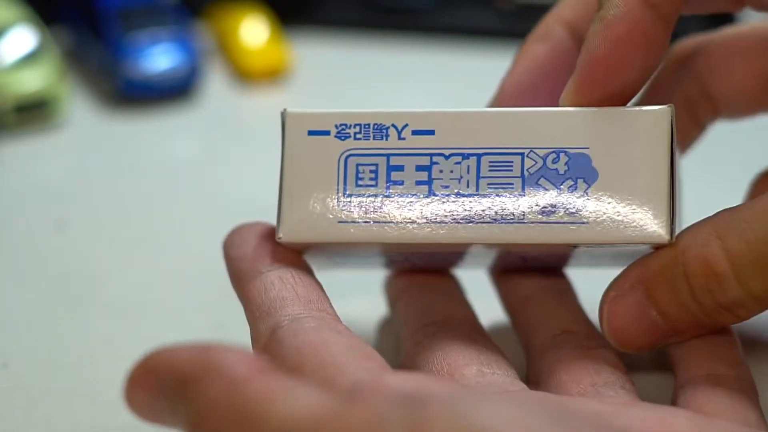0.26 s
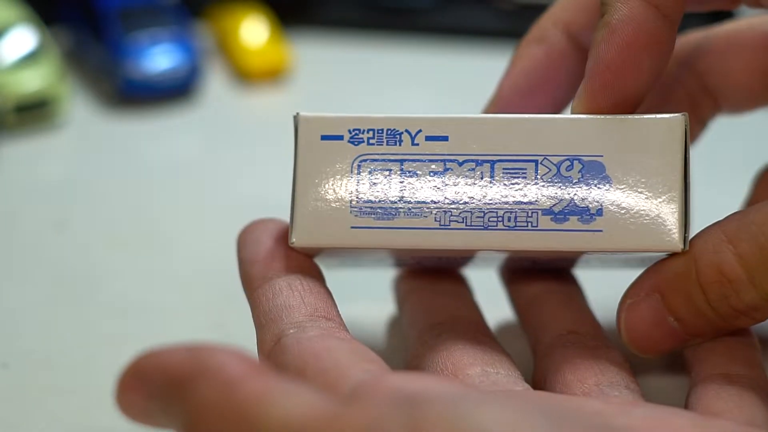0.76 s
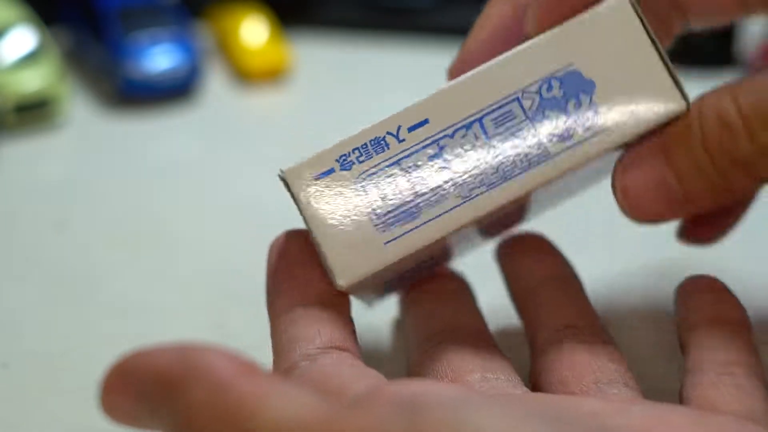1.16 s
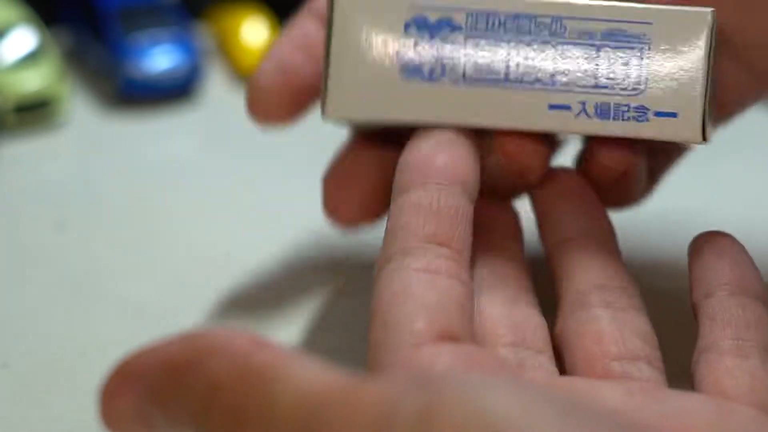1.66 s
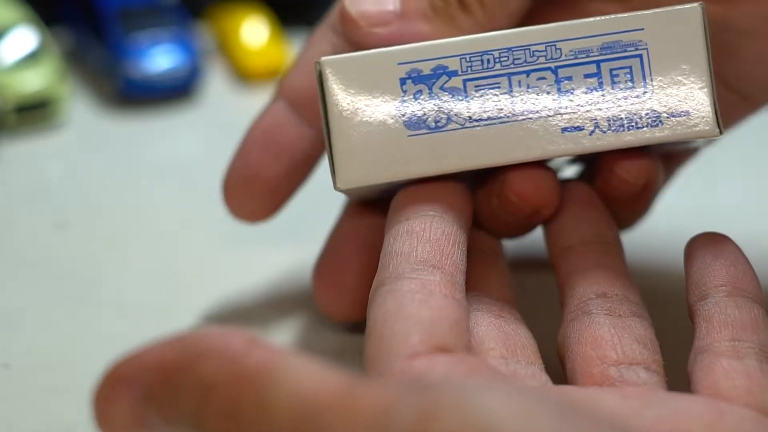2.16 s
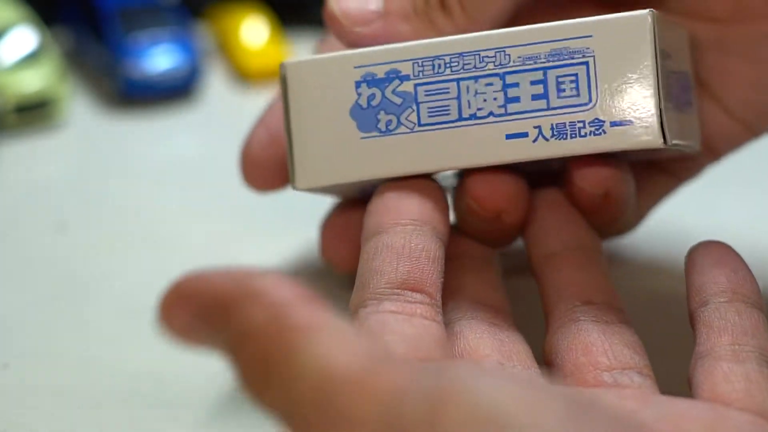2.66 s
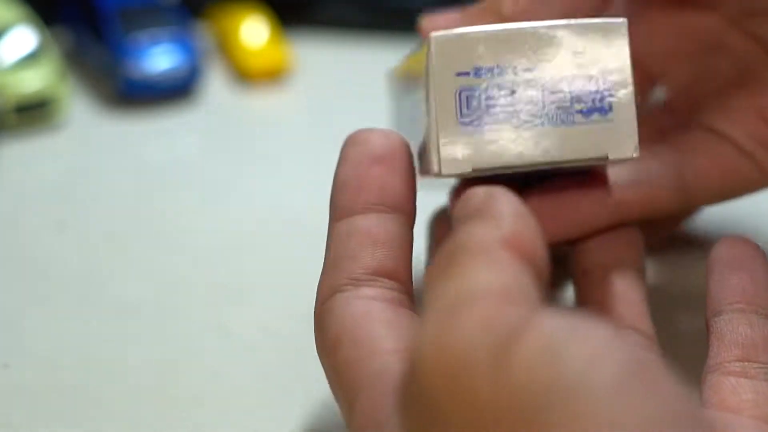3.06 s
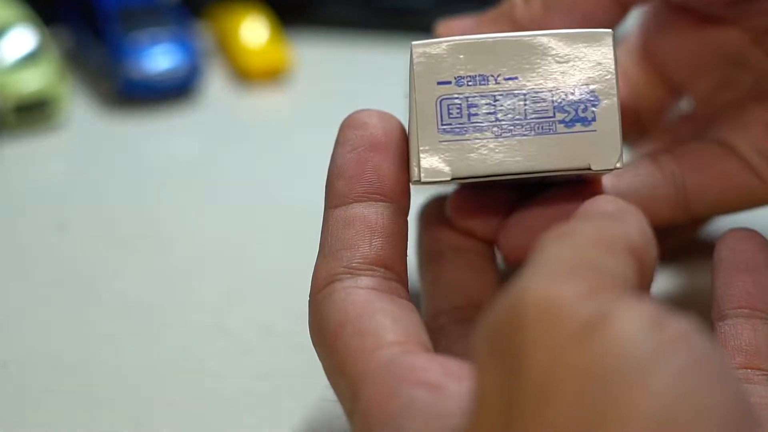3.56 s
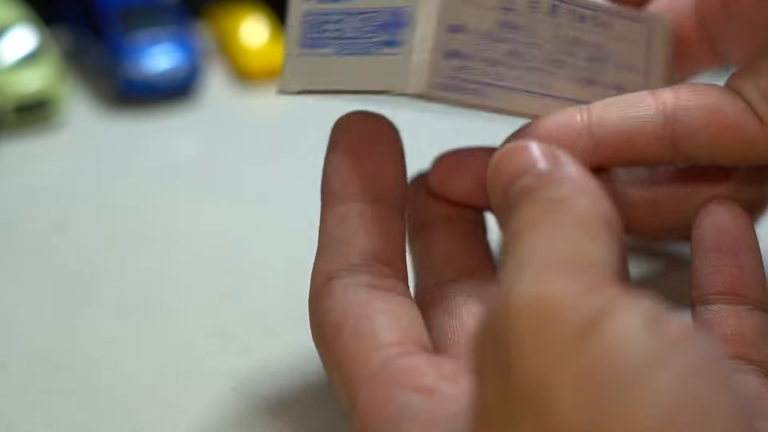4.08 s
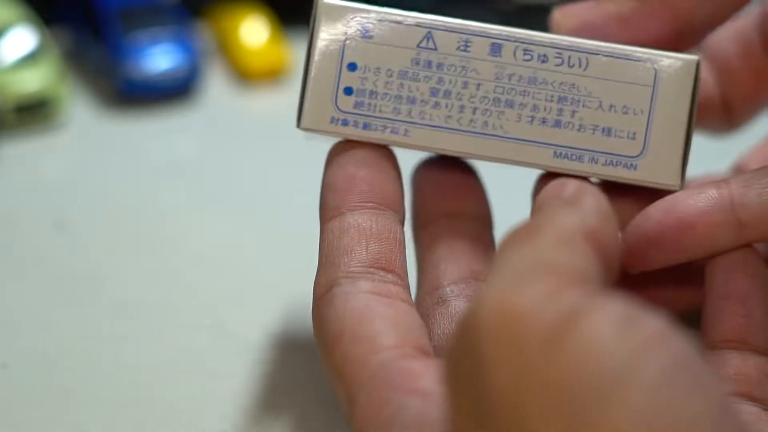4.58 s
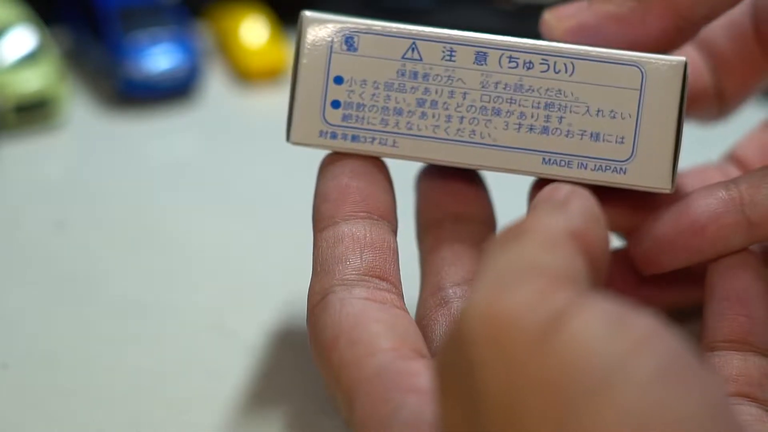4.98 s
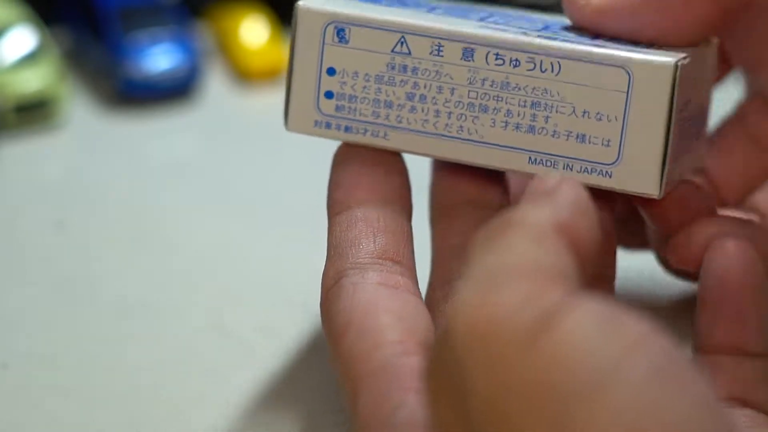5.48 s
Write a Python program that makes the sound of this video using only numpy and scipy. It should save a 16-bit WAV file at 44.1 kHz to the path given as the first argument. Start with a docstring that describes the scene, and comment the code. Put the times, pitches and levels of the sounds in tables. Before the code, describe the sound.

Close, dry clicks and skin rubs on a glossy little carton, one hard double knock midway, over steady fan rush, hum and approaching engine drone.

```python
"""A sharp knock on a small glossy cardboard box close to the microphones, then fingers turning it in the hand.
Nails and the toy inside tap its walls, which ring briefly; skin slides and rasps on the coat as grainy noise.
Behind it two machines hum a little apart in pitch and beat, a fan rushes as shaped noise, and faint tones glide.
Outside an engine slowly draws nearer: sines on multiples of its firing rate, with a narrow whine of noise."""
import sys
import numpy as np
from scipy import signal
from scipy.fft import rfft, irfft, next_fast_len
from scipy.io import wavfile
from scipy.ndimage import uniform_filter1d, map_coordinates

SR = 44100
rng = np.random.default_rng(int(sys.argv[2]) if len(sys.argv) > 2 else 0)


def wav_out(sig):
    """Save sig, one row per channel (or a flat mono array), as 16-bit PCM at SR to the path in sys.argv[1]."""
    wavfile.write(sys.argv[1], SR, np.round(np.clip(np.atleast_2d(sig).T, -1, 1) * 32767).astype(np.int16))


N = 252693

# Resonances of the box walls. Each row: pitch in Hz, relative level in dB when struck on the long face,
# relative level in dB when struck on the end face, time in s to fall 60 dB at a grip of 1.
WALLS = [(450, -28, -7, 0.02), (745, 1.5, -4, 0.012), (1134, -15, 3, 0.015), (1424, -4.5, -15.5, 0.014),
         (1834, 5, -5.5, 0.0058), (2220, -15.5, -18, 0.012), (2647, 3, -2, 0.0043), (3010, -9, -5, 0.0039),
         (3600, -2, -8, 0.0059), (4420, -8.5, -13.5, 0.011), (4740, -27, -19, 0.0039),
         (5370, -5, -9, 0.0043), (6230, -16, -30, 0.0062), (7000, -1, -25, 0.0086), (8450, -15, -6, 0.005)]


def amp(db):
    """Gain of a level in dB."""
    return 10 ** (np.asarray(db) / 20)


def unit(x):
    """Scaled to rms 1."""
    return x / np.sqrt(np.mean(x ** 2) + 1e-20)


def curves(rows):
    """One value per sample for each column after the time."""
    s, *columns = np.transpose(rows)
    return [np.interp(np.arange(N) / SR, s, column) for column in columns]


def wobble(rate):
    """A smooth random curve, rate knots a second."""
    knots = rng.standard_normal(int(N * rate / SR) + 4)
    return map_coordinates(knots, [np.arange(N) * rate / SR])


def filtered(x, response):
    """x times a response of frequency, with room for the filter to ring out."""
    m = next_fast_len(N + SR // 2)
    return irfft(rfft(x, m) * response(np.fft.rfftfreq(m, 1 / SR)), m)[..., :N]


def coloured(x, spectrum):
    """x shaped by (Hz, dB) points on a log frequency axis, rms 1."""
    f, db = np.transpose(spectrum)
    return unit(filtered(x, lambda hz: amp(np.interp(np.log(hz + 1), np.log(f + 1), db))))


def resonant(x, modes):
    """x through parallel (Hz, width in Hz, dB) resonances of alternating sign, rms 1."""
    def response(f):
        total = 0
        for k, (centre, width, db) in enumerate(modes):
            damping = 1j * f * width
            total = total + (-1) ** k * amp(db) * damping / (centre ** 2 - f ** 2 + damping)
        return total
    return unit(filtered(x, response))


def tone(hz, turn):
    """A sine of rms 1 on a pitch curve, starting turn cycles in."""
    cycles = np.cumsum(hz + np.zeros(N)) / SR + turn
    return np.sqrt(2) * np.sin(2 * np.pi * cycles)


def smooth_field(shape, bins, frames):
    """Random values averaged over neighbouring frequency bins and time frames, rms 1."""
    field = uniform_filter1d(rng.standard_normal(shape), size=bins, axis=0)
    return unit(uniform_filter1d(field, size=frames, axis=1))


def air():
    """The fan's rush: noise shaped by a fixed spectrum, a little patchy in time and pitch."""
    # Each row: frequency in Hz, relative level in dB per Hz.
    rush_spectrum = [(12, -30), (25, -6.5), (70, -7.5), (130, -8), (200, -1), (280, -5), (400, -6.5),
                     (660, -13.5), (1000, -11), (1420, -17), (1850, -20.5), (2200, -23), (2630, -24),
                     (3400, -30), (4520, -32), (8000, -38), (11200, -41), (22000, -120)]
    # Each row: time in seconds, level in dB rms.
    rush_level = [(0, -44), (1.3, -45), (2.1, -46.3), (2.7, -45.5), (4.7, -44.5), (5.73, -43)]
    z = signal.stft(rng.standard_normal(N), nperseg=512)[2]
    patchy = signal.istft(z * amp(1.2 * smooth_field(z.shape, 2, 20)), nperseg=512)[1][:N]
    return amp(curves(rush_level)[0]) * coloured(patchy, rush_spectrum)


def hum():
    """Two machines' close steady tones, each slightly unsteady in level, beat about three times a second."""
    in_step_s = 0.34  # the moment both sines start a cycle together
    out = np.zeros(N)
    for hz, db in ((99.93, -47), (97.12, -53)):  # pitch in Hz, level in dB rms
        out += amp(db + 0.56 * wobble(2.84)) * tone(hz, -hz * in_step_s)
    return out


def glides():
    """Faint sines that swell and fade while their pitch drifts in a straight line."""
    # Each row: start in seconds, length in s, first pitch in Hz, last pitch in Hz, peak level in dB rms,
    # share of the length spent rising.
    glide_rows = [(0.46, 0.41, 210.5, 222, -43, 0.34), (.85, 0.56, 228.6, 235.4, -52.5, .6),
                  (2.03, 0.95, 399, 403, -51.5, .55), (1.9, 2.14, 239, 248.5, -54, .55),
                  (1.75, 0.76, 193, 186.2, -52, .1), (3.5, .7, 124.8, 121.6, -53, .9)]
    out, t = np.zeros(N), np.arange(N) / SR
    for s, length, first_hz, last_hz, db, rising in glide_rows:
        u = np.clip((t - s) / length, 0, 1)
        swell = np.minimum(u / rising, (1 - u) / (1 - rising)) ** 0.64
        out += swell * amp(db) * tone(first_hz + u * (last_hz - first_hz), rng.random())
    return out


def engine():
    """Orders of the firing rate, each unsteady on its way through the walls, and a narrow whine."""
    # Each row: time in seconds, firing rate in Hz, base level in dB.
    approach = [(1.9, 39.5, -64), (2.6, 40.4, -63), (3.3, 40.76, -56), (3.7, 41.1, -50.5), (4, 41.4, -55.5),
                (4.3, 41.5, -52.5), (4.8, 41.67, -47.5), (5.16, 42.18, -44), (5.3, 41.83, -43.5),
                (5.73, 42.2, -39.5)]
    # Each row: multiple of the firing rate, level in dB above the base.
    order_levels = [(3, -28), (4, -12.5), (5, 0.9), (6, -6), (7, -23), (9, -15)]
    # Resonances that colour the whine. Each row: pitch in Hz, width in Hz, relative level in dB.
    whine_modes = [(1140, 140, 3), (2473, 33, 6.5), (2706, 31, 5)]
    # Each row: time in seconds, mean level of the whine in dB rms.
    whine_level = [(0, -62), (1.3, -70), (2.2, -80), (4.4, -75), (5.15, -57.5), (5.62, -49), (5.73, -55)]
    hz, db = curves(approach)
    fade_in = np.clip((np.arange(N) / SR - 1.7) / 0.34, 0, 1)
    orders = np.zeros(N)
    for k, level in order_levels:
        orders += amp(level + 0.7 * wobble(9.4)) * tone(k * hz, rng.random())
    whine = resonant(rng.standard_normal(N), whine_modes)
    whine *= amp(curves(whine_level)[0] + 0.67 * wobble(14))
    return fade_in * amp(db) * orders + whine


def room(x):
    """A short dull tail: x convolved with decaying low-passed noise, nearly alike at both capsules."""
    t60, onset_s = 0.078, 0.004
    t = np.arange(SR // 3) / SR
    tail = signal.lfilter([1], [1, -.6], rng.standard_normal((2, len(t))))
    tail *= amp(-60 * t / t60) * (t > onset_s)
    tail[1] = tail[0] + 0.14 * tail[1]  # the capsules sit close together
    tail /= np.linalg.norm(tail, axis=1, keepdims=True)
    return signal.fftconvolve(x[None], tail, axes=1)[:, :N]


def rubbing():
    """Skin catches and slips in dense tiny grains near a moving pitch; pressed harder it also sounds the walls."""
    # Strokes over the box. Each row: peak time in seconds, rise in s, fall in s, skin level at the peak in dB rms,
    # pressure from 0 to 1 (more of it drives the walls), brightest pitch in Hz.
    stroke_rows = [(1.16, .06, 0.022, -48.5, 0.2, 8400), (1.33, 0.085, .13, -50.5, 0.26, 7300),
                   (1.47, 0.052, .07, -48, 0.28, 9300), (1.58, 0.086, 0.031, -50.5, 0.44, 7500),
                   (1.69, 0.025, 0.076, -50, 0.18, 4600), (1.8, 0.074, 0.042, -54.5, 0.46, 7000),
                   (2.46, 0.022, .13, -53, 0.25, 6100), (2.59, .09, 0.043, -54.5, 0.52, 5800),
                   (2.84, .09, .05, -55.5, 0.37, 7600), (2.91, 0.048, 0.056, -46.5, 0.25, 7550),
                   (3.02, 0.097, 0.066, -54.5, 0.13, 6700), (3.64, 0.065, 0.095, -55.5, 0.28, 6900),
                   (3.94, 0.11, 0.15, -57, 0.14, 7500), (4.115, .03, 0.052, -53, .4, 6500),
                   (4.21, 0.029, .06, -47.5, .55, 5300), (4.265, .04, 0.024, -48, .4, 7000),
                   (5.4, .04, 0.11, -56.5, .37, 7600), (5.63, 0.048, 0.062, -51, 0.34, 7700),
                   (5.73, .04, 0.039, -56, .32, 6800)]
    # Each row: frequency in Hz, relative level in dB per Hz.
    skin_spectrum = [(1470, 8.5), (2500, -31), (3170, -26), (3900, 2), (5310, -1), (6290, 2.5), (8770, 2.5),
                     (10500, 5.5), (11200, -6), (14600, -38), (22000, -120)]
    fade_db = 11  # drop over one rise or fall time
    # fingers that merely hold the box still shift a little
    hold_db, hold_pressure, hold_hz = -62, 0.35, 6600
    s, rise, fall, db, press, hz = np.transpose(stroke_rows)[:, :, None]
    late = np.arange(N) / SR - s
    power = amp(2 * (db - fade_db * (late / np.where(late < 0, rise, fall)) ** 2))
    hold = amp(2 * hold_db)
    total = hold + power.sum(axis=0)
    # the loudest contact sets pressure and colour
    pressure = (hold * hold_pressure + (power * press).sum(axis=0)) / total
    bright_hz = (hold * hold_hz + (power * hz).sum(axis=0)) / total

    slips = rng.standard_normal((2, N)) * amp(1.6 * wobble(300) + 0.98 * wobble(40))
    bin_hz, t, z = signal.stft(coloured(slips[0], skin_spectrum), SR, nperseg=512)
    octaves = np.log2((bin_hz[:, None] + 1) / np.interp(t * SR, np.arange(N), bright_hz))
    colour_db = 5 * np.exp(-(octaves / .45) ** 2)
    colour_db += 2.2 * smooth_field(z.shape, 8, 12)  # the contact keeps changing shape
    skin = unit(signal.istft(z * amp(colour_db), SR, nperseg=512)[1][:N])
    # width from the decay time, levels as on the end face
    modes = [(wall_hz, 5 / t60, end_db) for wall_hz, _, end_db, t60 in WALLS]
    return np.sqrt(total) * (skin + 2.46 * pressure * resonant(slips[1], modes))


def rasps():
    """Skin on the glossy coat: short grainy swells of noise in one narrow band each."""
    # Each row: start in seconds, length in s, centre in Hz, width in Hz, mean level in dB at the top of the swell.
    rasp_rows = [(.012, 0.061, 1900, 510, -48), (1.468, 0.022, 1300, 900, -43), (1.68, .05, 4300, 630, -56),
                 (2.446, .05, 4460, 700, -57.5), (2.7, 0.18, 5900, 430, -58), (2.6, 0.082, 6400, 940, -63),
                 (4.212, 0.038, 4300, 300, -49.5), (4.222, 0.055, 1220, 350, -38),
                 (4.216, 0.066, 8200, 4000, -51), (4.735, 0.036, 8100, 3700, -53)]
    out, t = np.zeros(N), np.arange(N) / SR
    for s, length, hz, width, db in rasp_rows:
        swell = np.sqrt(np.sin(np.pi * np.clip((t - s) / length, 0, 1)).clip(0))
        band = resonant(rng.standard_normal(N), [(hz, width, 0)])
        out += amp(db + wobble(150)) * swell * band
    return out


def taps():
    """Each tap rings the walls pitched near its colour and cracks briefly; loosely gripped, it rebounds twice."""
    # Each row: start in seconds, level in dB, centre of the struck colour in Hz, its breadth in octaves,
    # grip as a factor on the damping, nail crack in dB relative to the ring,
    # place from 0 on the long face to 1 on the end face.
    tap_rows = [(.003, -1, 1810, 1.62, 0.67, -14.5, 0.077), (.017, -43, 1800, .8, .65, 6, .05),
                (1.3712, -38, 8500, 0.97, 0.97, 3, .55), (1.4705, -31, 1800, 1.4, 1.2, -9, .55),
                (1.4849, -10.5, 1960, 1.2, 1.5, -5, 0.12), (1.502, -20.5, 3000, 0.84, 0.83, -5.5, .44),
                (1.5031, -22, 1800, 1.2, 1.4, -24, .22), (1.5064, -16, 1400, 1.2, 1.9, -19, 0.82),
                (1.5158, -17, 2110, 0.34, 2.1, -28, .22), (1.677, -27, 4600, 0.49, 1.6, -11, 0.96),
                (1.696, -28.5, 1500, 0.8, 1.6, -15, 0.66), (1.9132, -37.5, 3440, 1.05, 1.1, -14, .55),
                (2.293, -27.5, 1400, 1.4, 1.4, -15, 1), (2.45, -37, 6200, .39, 1.1, -5, .4),
                (2.54, -34, 910, 1.16, 0.95, -25, .46), (2.665, -48, 2650, .27, .68, -25, .55),
                (2.7, -38, 800, .39, 1, -25, .57), (2.752, -39, 1000, .52, 1.1, -28, .55),
                (2.887, -34, 2180, 1.08, 0.82, -18, .22), (3.1325, -26, 3500, 2.8, 1, -11, .6),
                (3.2334, -41, 5000, 1.6, 1.1, 3, .55), (3.861, -40, 4300, .48, 1.4, -16, .79),
                (4.1115, -26, 2020, 0.64, 1.1, -22, .3), (4.122, -23, 1450, 0.7, .95, -30, 0.57),
                (4.135, -36, 1200, 1.1, 1.1, -25, .6), (4.1893, -3, 2000, 1.28, 0.9, -15, 0.76),
                (4.2015, -11, 1900, 1.3, 1.3, -29, .79), (4.2045, -24, 1000, 1.1, 1.5, -14, 1),
                (4.2072, -21, 2300, 0.67, 1.5, -21, .62), (4.263, -29.5, 990, 0.96, .8, -9, .4),
                (4.276, -44, 8000, .46, 1.1, -15, .55), (4.4823, -31.5, 2000, 1.4, 1.1, -10, 0.57),
                (4.62, -34, 2500, 1.4, 1.1, -6, 0.6), (4.74, -27.5, 2300, 1.4, 1.1, -12, 0.73),
                (4.976, -38, 2500, 1.22, .83, -1, .55), (5.02, -37, 7980, 1, 1, -1.5, .55),
                (5.065, -39, 8100, 1.1, 0.98, -1, .55), (5.111, -35.5, 4000, 1.4, 0.83, -4, .55),
                (5.3955, -30.5, 1394, 0.79, 1.17, -24, .66), (5.54, -22, 1502, 1.29, 0.99, -13, 0.89),
                (5.672, -26, 1580, 0.38, 1.9, -21, 0.6)]
    rebound_full, rebound_per_grip = 1.105, 0.6  # a firmer grip leaves less rebound
    gap = round(0.001203 * SR)  # s from the tap to its first repeat, in samples
    crack_t60 = 0.0041
    out, t = np.zeros(N + SR), np.arange(SR // 10) / SR
    hz, face_db, end_db, t60 = np.transpose(WALLS)[:, :, None]
    for s, db, centre, breadth, grip, crack_db, place in tap_rows:
        level = face_db + place * (end_db - face_db)
        level = level - 6 * (np.log2(hz / centre) / breadth) ** 2
        level = level + rng.normal(0, 0.88, hz.shape)
        ring = (amp(level - 60 * grip * t / t60) * np.sin(2 * np.pi * hz * t)).sum(axis=0)
        # a soft, narrow contact swells over a cycle or two
        ring *= 1 - np.exp(-t * centre * breadth ** 3 / 0.75)
        # differenced noise is bright
        crack = amp(crack_db - 60 * t / crack_t60) * np.diff(rng.standard_normal(len(t) + 1))
        blow = ring / np.abs(ring).max() + crack

        rebound = np.clip(rebound_full - rebound_per_grip * grip, 0, 1)
        second_gap = round(gap * rng.uniform(1.67, 2.2))
        # two weaker repeats follow, each a delayed copy of the bare blow
        blow += first_and_second(blow, rebound, gap, second_gap)
        out[round(s * SR):][:len(t)] += amp(db) * blow
    # so small a box sends out no bass
    return filtered(out[:N], lambda f: (1j * f / (420 + 1j * f)) ** 2)


def first_and_second(blow, rebound, gap, second_gap):
    """The two weaker, delayed repeats of a blow."""
    first = np.pad(blow, (gap, 0))[:len(blow)]
    second = np.pad(blow, (second_gap, 0))[:len(blow)]
    return rebound * first + rebound ** 2 * second


def scene():
    """Everything arrives from the front, nearly mono; the turning box sways a little between the capsules."""
    tapping = taps()
    sway = amp(np.array([[1], [-1]]) * 0.11 * wobble(8))
    box = sway * (tapping + rubbing() + rasps()) + amp(-21) * room(tapping)
    return box + hum() + engine() + glides() + air()


def record(dry):
    """Each capsule adds its own hiss, then a steep band limit cuts the top."""
    # Each row: frequency in Hz, relative level in dB per Hz.
    hiss_spectrum = [(12, -9), (25, 9), (60, -5), (125, -22), (250, -16.5), (600, -11), (1150, -24),
                     (2200, -18.5), (4000, -15.5), (8370, -16), (11200, -17.5), (22000, -120)]
    hiss_db, top_hz = -61, 11150  # hiss in dB rms before the band limit
    hiss = amp(hiss_db) * coloured(rng.standard_normal((2, N)), hiss_spectrum)
    return filtered(dry + hiss, lambda hz: 1 / (1 + (hz / top_hz) ** 300))


dry = scene()
out = record(dry)
wav_out(out)
```